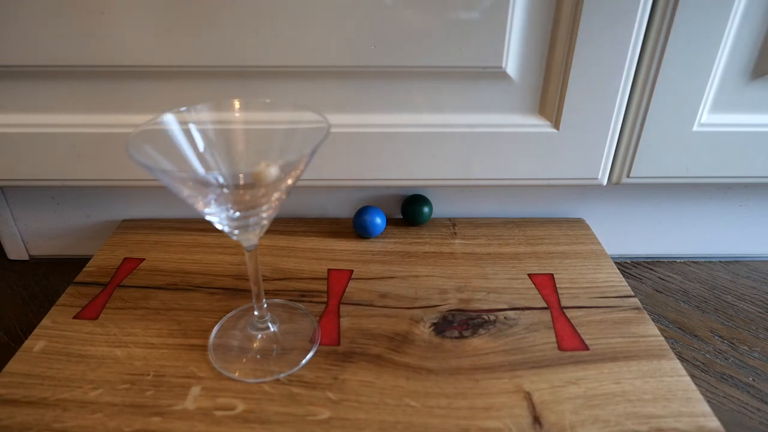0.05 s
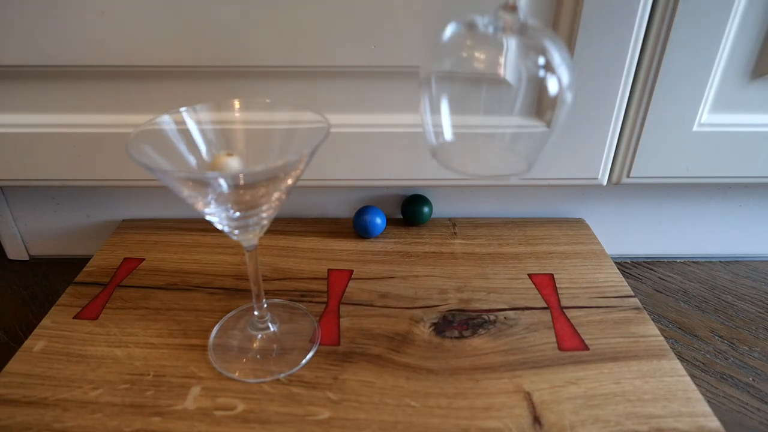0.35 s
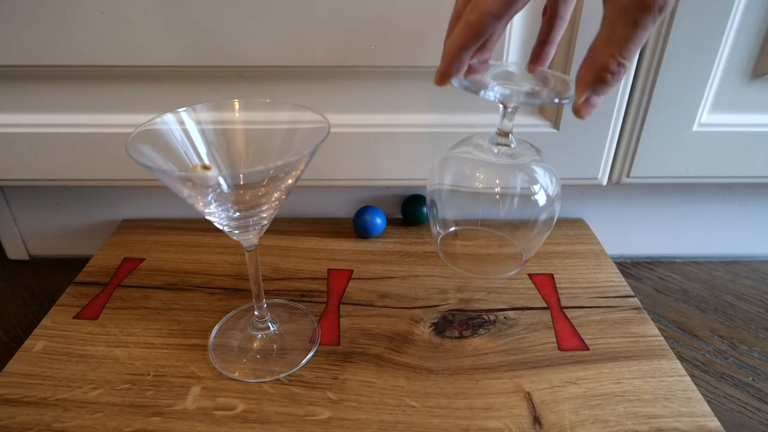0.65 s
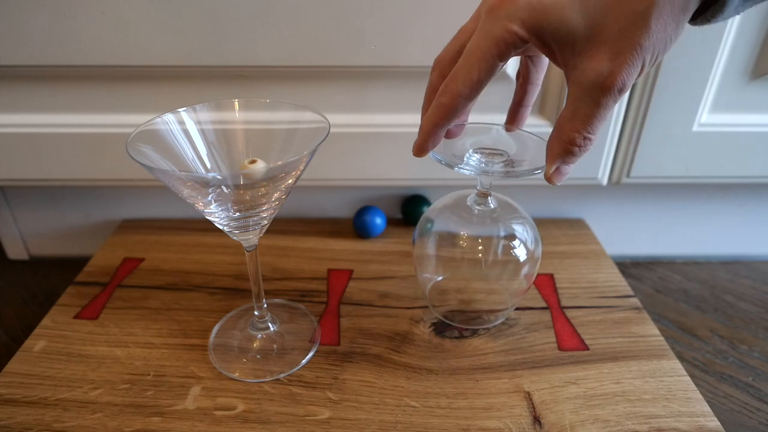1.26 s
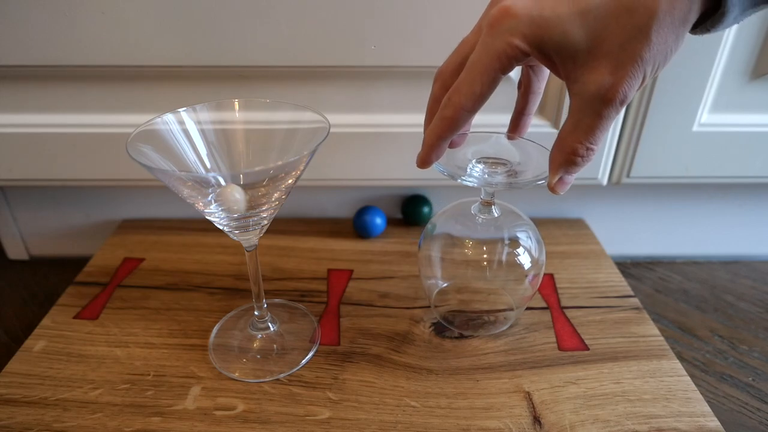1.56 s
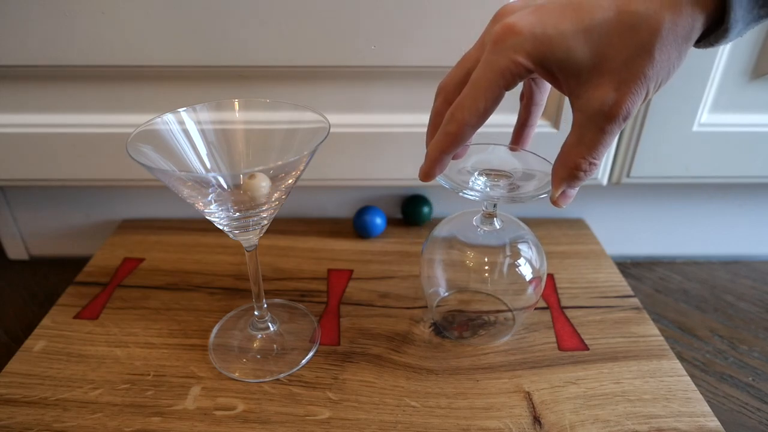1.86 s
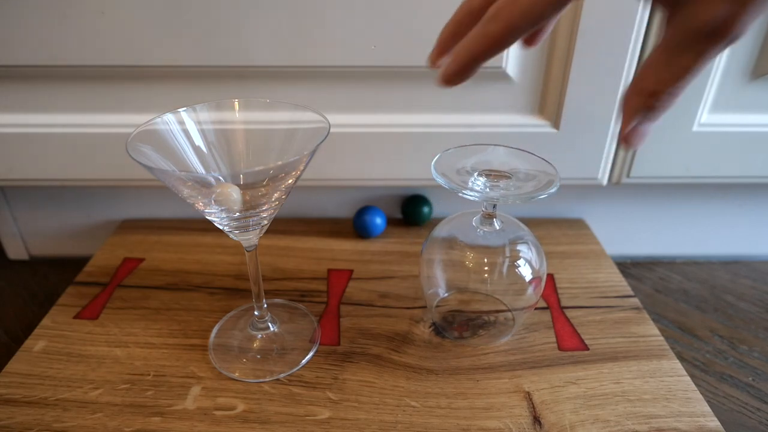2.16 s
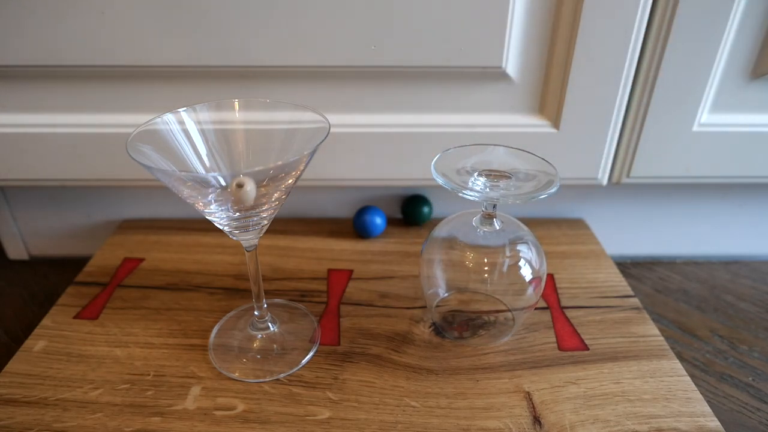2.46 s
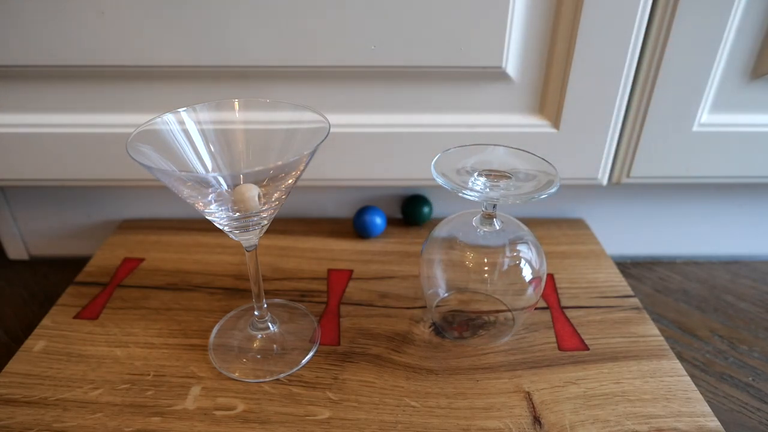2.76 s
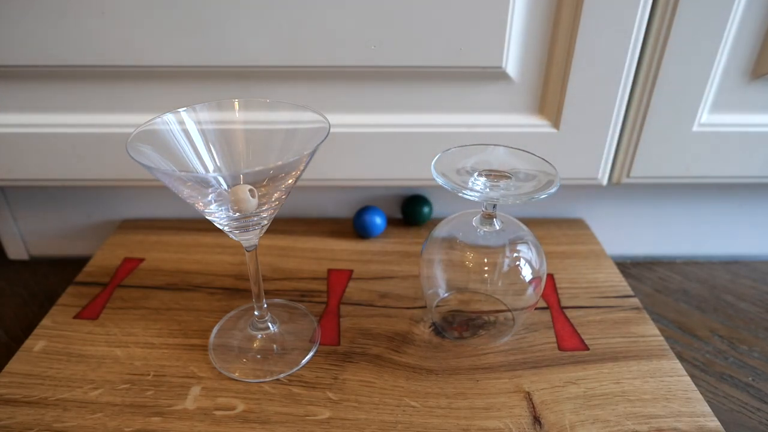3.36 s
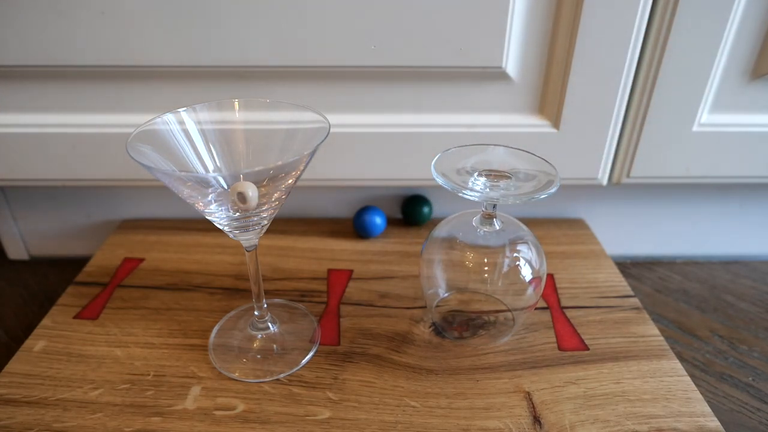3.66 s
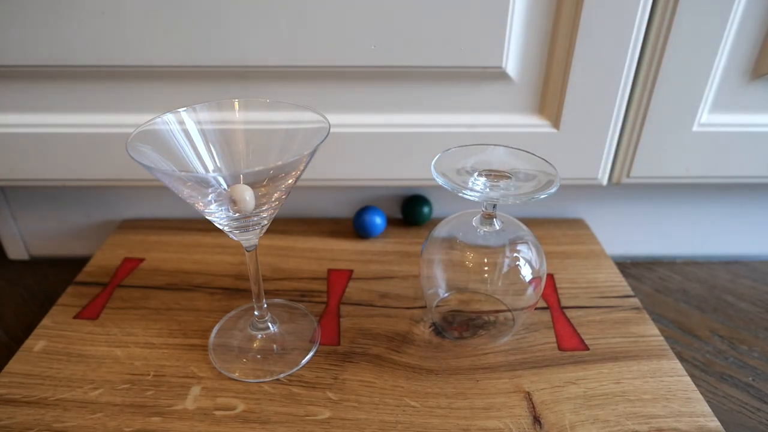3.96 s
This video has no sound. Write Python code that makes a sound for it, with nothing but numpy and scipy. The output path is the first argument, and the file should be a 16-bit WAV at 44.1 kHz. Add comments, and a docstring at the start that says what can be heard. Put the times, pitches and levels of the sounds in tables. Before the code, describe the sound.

A small ball circles inside a cocktail glass, rolling in swells that keep it ringing. A second glass lands on wood with a dull thump, then the ball rattles and rocks to rest, close by in a small room.

```python
"""A ball circling in a glass

A small ball circles inside a cocktail glass on a wooden board, close by in a small room.
Its rolling swells on every half lap and keeps the bowl of the glass ringing with a fast beat.
It rattles as it drops to the bottom, then rocks to rest. A second glass is lifted from
the board at the start and later set down on its rim with a thump."""
import sys
import numpy as np
from scipy import signal
from scipy.fft import rfft, irfft, next_fast_len
from scipy.io import wavfile
from scipy.ndimage import map_coordinates

SR = 44100
rng = np.random.default_rng(int(sys.argv[2]) if len(sys.argv) > 2 else 0)


def int16_out(signal):
    """Quantize to a 16-bit WAV file."""
    q = np.round(np.clip(np.atleast_2d(signal).T, -1, 1) * 32767)
    wavfile.write(sys.argv[1], SR, q.astype(np.int16))


N = 176400
TIME = np.arange(N) / SR


def amp(db):
    """Turn decibels into a gain."""
    return 10 ** (np.asarray(db) / 20)


def unit(x):
    """Scale a signal to an average power of 1."""
    return x / np.sqrt(np.mean(x ** 2) + 1e-20)


def along(points, hz):
    """Read between (Hz, value) points on a logarithmic frequency scale."""
    freqs, values = np.transpose(points)
    return np.interp(np.log(hz + 1), np.log(freqs + 1), values)


def curve(points):
    """Join (seconds, value) points with straight lines."""
    return np.interp(TIME, *np.transpose(points))


def wobble(rate):
    """A smooth random curve through `rate` points a second."""
    points = rng.standard_normal(int(N * rate / SR) + 4)
    return map_coordinates(points, [np.arange(N) * rate / SR])


def coloured(x, colour, size=4096):
    """Filter x; the colour sets only the balance of low and high, not the overall level."""
    cepstrum = irfft(np.log(amp(along(colour, np.fft.rfftfreq(size, 1 / SR)))))
    cepstrum[1:size // 2] *= 2  # folded so that the filter never sounds ahead of its input
    cepstrum[size // 2 + 1:] = 0
    response = irfft(np.exp(rfft(cepstrum)))
    return signal.fftconvolve(x, response / np.linalg.norm(response))[:len(x)]


def add(track, start, sound):
    """Mix a sound into the track, `start` seconds in."""
    part = track[max(round(start * SR), 0):][:len(sound)]
    part += sound[:len(part)]


# The colour of the room's air. Each row: frequency in Hz, relative level in dB.
AIR_COLOUR = [(25, -31), (79, -19.5), (129, -6), (246, -5), (457, -9), (703, -12), (1240, -15.5),
              (4040, -21), (11200, -26), (15500, -34)]
# How alike the air is left and right. Each row: frequency in Hz, likeness (1 is identical).
AIR_LIKENESS = [(40, .05), (150, 0.13), (400, 0.15), (1500, 0.12), (10000, 0.46)]

def room_air(level_db=-63):
    """The quiet, steady hiss of the room."""
    hz = np.fft.rfftfreq(N, 1 / SR)
    spread = np.arccos(along(AIR_LIKENESS, hz)) / 2
    spectrum = rfft(rng.standard_normal((2, N))) * amp(along(AIR_COLOUR, hz))
    mid, side = irfft(spectrum * [np.cos(spread), np.sin(spread)], N)
    return amp(level_db) * np.array([mid + side, mid - side]) / np.std(mid)


# The room's echo. Each row: frequency in Hz, seconds to fade by 60 dB.
ECHO_FADE = [(150, 0.5), (600, 0.63), (2500, 0.19), (6000, 0.31), (12000, 0.19)]

def in_room(x, echo_db, width, pan_db, wide_below_hz=1460):
    """A sound plus the room's short echo, which is wider in the bass."""
    hz, t, noise = signal.stft(rng.standard_normal((2, SR // 2)), SR, nperseg=256)
    fade = amp(-60 * t / along(ECHO_FADE, hz)[:, None])
    tails = signal.istft(noise * fade * (1 - np.exp(-t / .002)), SR, nperseg=256)[1]
    tails /= np.linalg.norm(tails[0])
    mid, side = amp(echo_db) * signal.fftconvolve(x[None], tails, axes=1)[:, :N]
    side = width * signal.lfilter(*signal.butter(1, wide_below_hz, fs=SR), side)
    return np.array([x + mid + side, x + mid - side]) * amp([[pan_db], [-pan_db]])


# The board's rumble. Each row: time in seconds, level in dB.
RUMBLE_LEVELS = [(0, -36.5), (.03, -42), (.07, -48.5), (.11, -41), (.17, -51.5), (.27, -70.5), (.55, -83),
                 (.8, -120)]
# Its colour. Each row: frequency in Hz, relative level in dB.
RUMBLE_COLOUR = [(50, -48), (110, -8.5), (170, 4), (260, -11), (360, -2.5), (560, -16), (850, -37),
                 (1060, -19.5), (1200, -38.5), (4000, -76)]

def glass_lifted():
    """The board rumbles as the second glass leaves it."""
    return amp(curve(RUMBLE_LEVELS)) * coloured(rng.standard_normal(N), RUMBLE_COLOUR)


# The second glass hits the board. Each row: start in seconds, strength in dB.
LANDINGS = [(1.7996, -21.5), (1.829, -40)]
# Tones of that glass and the board. Each row: pitch in Hz, relative level in dB, seconds to fade 60 dB.
THUMP_TONES = [(203.5, -6.5, 0.1), (394.2, -1, 0.11), (449, -3.5, 0.09), (589, -15.5, .1), (695, -14, 0.16),
               (867, -18.5, 0.096), (1064.5, -12.5, 0.28), (1213, -21, 0.26), (1710, -29, .1),
               (2783, -10.5, 0.074)]
# The puff of noise in each blow. Each row: frequency in Hz, relative level in dB.
PUFF_COLOUR = [(50, -47), (130, -7.5), (220, 1), (400, 8), (700, -12.5), (1500, -16.5), (4000, -25),
               (10000, -63)]

def glass_set_down(puff_db=-3.5, puff_fade_s=.11, attack_s=.0012, bass_cut_hz=143):
    """A dull double blow as the rim lands; the small board gives off no deep bass."""
    blows, t = np.zeros(N), TIME[:SR // 2]
    ring = sum(amp(db - 60 * t / fade_s) * np.sin(2 * np.pi * hz * t) for hz, db, fade_s in THUMP_TONES)
    for start, db in LANDINGS:
        puff = amp(puff_db - 60 * t / puff_fade_s) * coloured(rng.standard_normal(len(t)), PUFF_COLOUR)
        add(blows, start, amp(db) * (ring + puff) * (1 - np.exp(-t / attack_s)))
    return signal.lfilter(*signal.butter(3, bass_cut_hz, "high", fs=SR), blows)


# The rolling swells once per half lap, then with the last rocking.
# Each row: time of the peak in seconds, level in dB, half width in seconds.
SWELLS = [(.04, -53, .025), (.122, -47, .016), (.292, -46, .016), (.364, -45, .018), (.533, -49, .014),
          (.603, -45.5, .015), (.782, -48, .022), (.87, -53, .03), (1.0, -46, .018), (1.235, -49, .034),
          (1.416, -46, .013), (1.595, -52, .017), (1.775, -52, .035), (1.948, -49, .015), (2.095, -50, .03),
          (2.257, -46.5, .019), (2.42, -48, .02), (2.54, -45.5, .036), (2.675, -54, .016),
          (2.745, -50, .007), (2.893, -55, .006), (3.098, -57, .012)]
# The rolling between swells. Each row: time in seconds, level in dB.
ROLL_LEVELS = [(0, -50.5), (.7, -56.5), (2.3, -57), (2.62, -55), (2.83, -67), (3.15, -65), (3.45, -75),
               (4, -100.5)]

def rolling_forces(contacts_per_s=800, spread_db=8, cluster_db=3.5, settle_s=2.7):
    """Clusters of tiny contacts give a soft and a sharp force; pressing harder favours the sharp one."""
    swells = sum(amp(db) ** 2 * np.exp(-.5 * ((TIME - peak) / width) ** 2) for peak, db, width in SWELLS)
    pressure = np.sqrt(amp(curve(ROLL_LEVELS)) ** 2 + swells)
    sizes = amp(spread_db * np.minimum(rng.exponential(size=N), 2)) * rng.choice([-1, 1], N)
    ticks = unit(sizes * (rng.random(N) < contacts_per_s / SR))
    contacts = ticks + .22 * rng.standard_normal(N)
    contacts = unit(contacts * amp(cluster_db * wobble(rate=110)))
    loud_db = -46  # both forces are equally strong at this pressure, until the ball settles
    softening_db = 30 * np.maximum(TIME - settle_s, 0)
    sharpness = amp(loud_db - softening_db) * (pressure / amp(loud_db)) ** 1.86
    return contacts * pressure, contacts * sharpness


# The ball knocks on the bowl. Each row: start in seconds, strength in dB, treble limit in Hz.
KNOCKS = [(.1025, -23, 8000), (.1105, -20, 7000), (.1195, -10, 8000), (.1297, -11, 8000),
          (.139, -10, 12000), (.277, -16, 6000), (.291, -19, 4500), (.351, -22, 7000), (.375, -20, 6500),
          (.381, -19, 6000), (.521, -23, 4500), (.5915, -23, 6000), (.6112, -17, 7500), (1.0, -24, 11000),
          (1.322, -25, 8000), (1.403, -22, 6500), (1.414, -23, 6500), (1.578, -27, 6000),
          (1.668, -30, 6500), (1.754, -23, 6500), (2.206, -27, 6500), (2.3627, -13, 9500),
          (2.3892, -4.5, 8500), (2.4084, -9, 7000), (2.4296, -10, 14000), (2.4564, -8.5, 7000),
          (2.4986, -7, 12000), (2.5145, -12, 8000), (2.5265, -16, 6000), (2.5398, -15, 7500),
          (2.5548, -19, 5000), (2.5725, -20, 7000)]

def knock_force(skid_db=-14, skid_fade_s=.0035):
    """Each hop of the ball is a blow and a brief skid; a shorter contact is brighter."""
    force, t = np.zeros(N), TIME[:256]
    for start, db, limit_hz in KNOCKS:
        skid = amp(skid_db - 60 * t / skid_fade_s) * rng.standard_normal(len(t))
        contact = signal.unit_impulse(len(t)) + skid
        contact = signal.lfilter(*signal.butter(3, limit_hz, fs=SR), contact / np.linalg.norm(contact))
        add(force, start, rng.choice([-1, 1]) * amp(db) * contact)
    return force


# Colours of the rolling's body, its grit and a knock. Each row: frequency in Hz, relative level in dB.
BODY_COLOUR = [(100, -23.5), (300, -14), (470, -8.5), (570, 6.5), (680, -12), (920, -14.5), (1300, -4),
               (1700, 1.5), (2500, -4.5), (4500, -14), (9000, -38.5), (15000, -56.5)]
GRIT_COLOUR = [(900, -22.5), (1900, 7), (3000, 7), (4300, 4), (6000, -2), (8500, -18), (10400, -15.5),
               (11300, -38.5)]
KNOCK_COLOUR = [(150, -43), (560, -3.5), (850, -10.5), (1600, 1), (2900, -4), (4200, 0), (7000, -1.5),
                (10500, -4.5), (11800, -16), (15500, -21.5)]
# The bowl's short tones. Each row: pitch in Hz, seconds to fade 60 dB, relative level in dB,
# change in dB per second as the ball sinks.
STRUCK_TONES = [(2231, 0.25, -3, -1), (2850, 0.25, -8, -6), (5153, .27, -7, 1.5), (9938, 0.09, 1, -5),
                (10121, 0.08, 1, -6), (10560, 0.09, -1, -1), (13560, 0.06, -15, -2)]

def ball(body_db=2, grit_db=2.5, roll_ring_db=-5, knock_ring_db=3.5, attack_s=.0005):
    """The ball rolls and knocks, and every contact strikes short tones from the bowl."""
    soft, sharp = rolling_forces()
    knocks = knock_force()
    sound = amp(body_db) * coloured(soft, BODY_COLOUR) + amp(grit_db) * coloured(sharp, GRIT_COLOUR)
    sound += coloured(knocks, KNOCK_COLOUR)
    drive = amp(roll_ring_db) * sharp + amp(knock_ring_db) * knocks
    t = TIME[:SR // 2]
    for hz, fade_s, db, db_per_s in STRUCK_TONES:
        ping = np.sin(2 * np.pi * hz * t) * (1 - np.exp(-t / attack_s)) * amp(-60 * t / fade_s)
        sound += signal.fftconvolve(drive * amp(db + db_per_s * TIME), ping / np.linalg.norm(ping))[:N]
    return sound


# The bowl's long tones: its lowest pair, then three overtones.
# Each row: time in seconds, relative level in dB.
PAIR_LOWER = [(0.0, -43), (0.3, -31), (0.42, -37), (0.621, -26), (0.779, -39.5), (1.2, -38), (1.5, -54),
              (1.77, -41), (1.88, -54), (2.03, -41.5), (2.2, -38.5), (2.36, -56), (2.364, -34), (2.46, -52),
              (2.68, -53), (3.6, -88)]
PAIR_UPPER = [(0.0, -31), (0.16, -38), (0.31, -32), (0.62, -26), (0.75, -43), (0.87, -33), (1.3, -39),
              (1.55, -48), (1.88, -40), (2.14, -41), (2.33, -57), (2.53, -37.5), (3.44, -87)]
LOW_OVERTONE = [(0, -47), (.71, -48.5), (.75, -54), (1.02, -53.5), (1.5, -59), (1.87, -54.5), (2.1, -75),
                (3.2, -88)]
MID_OVERTONE = [(0, -51.5), (.05, -40), (.15, -54.5), (.43, -59.5), (0.529, -49.5), (.66, -57.5),
                (2.6, -91)]
HIGH_OVERTONE = [(.5, -66), (2.35, -55), (2.38, -45), (2.58, -38.5), (2.87, -92)]

def singing_bowl(ring_db=-.3, flutter_db=2.2):
    """Two close tones beat under rougher overtones; the ball keeps them all unsteady until it settles."""
    stir = amp(curve(ROLL_LEVELS) + 56.5).clip(0, 1)  # full while the rolling is above -56.5 dB

    def tone(hz, levels, wander_radians=.6):
        phase = 2 * np.pi * hz * TIME + wander_radians * stir * wobble(rate=40)
        level_db = ring_db + curve(levels) + flutter_db * stir * wobble(rate=60)
        return np.sqrt(2) * amp(level_db) * np.sin(phase)

    low_overtone = tone(2866, LOW_OVERTONE) + amp(-4) * tone(2851, LOW_OVERTONE)  # this one beats too
    pair = tone(2189, PAIR_LOWER, wander_radians=.25) + tone(2207.2, PAIR_UPPER, wander_radians=.25)
    return pair + low_overtone + tone(3585, MID_OVERTONE) + tone(5152, HIGH_OVERTONE)


def scene(bowl_pan_db=.5):
    """The singing glass is a little to the left, the second glass a little to the right."""
    ring = singing_bowl() * amp([[bowl_pan_db], [-bowl_pan_db]])
    rolling = in_room(ball(), echo_db=-8, width=1.38, pan_db=bowl_pan_db)
    second_glass = in_room(glass_set_down() + glass_lifted(), echo_db=-11.5, width=1.3, pan_db=-.3)
    return ring + rolling + second_glass + room_air()


def record(dry, top_hz=15850):
    """Cut away the very highest treble."""
    size = next_fast_len(N + SR // 2)
    kept = np.fft.rfftfreq(size, 1 / SR) < top_hz
    return irfft(rfft(dry, size) * kept, size)[:, :N]


dry = scene()
out = record(dry)
int16_out(out)
```